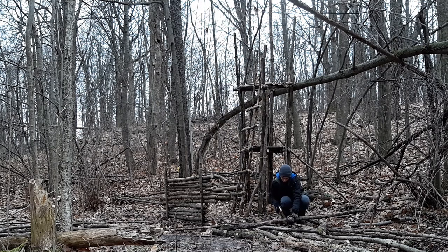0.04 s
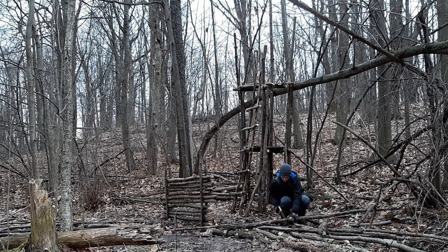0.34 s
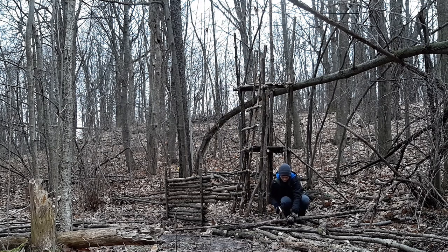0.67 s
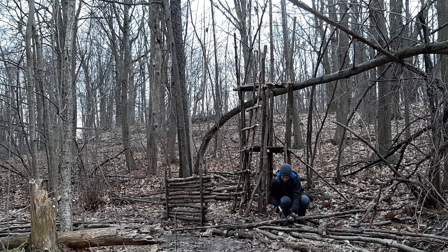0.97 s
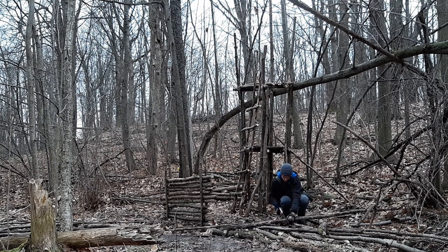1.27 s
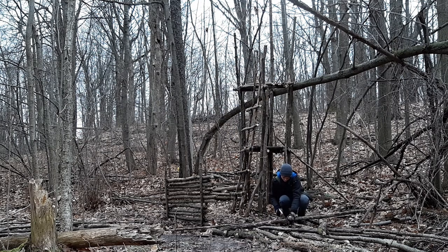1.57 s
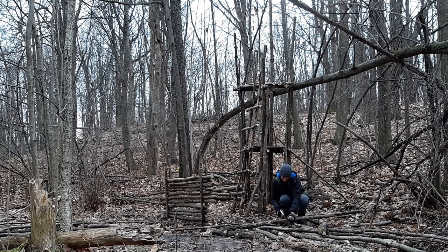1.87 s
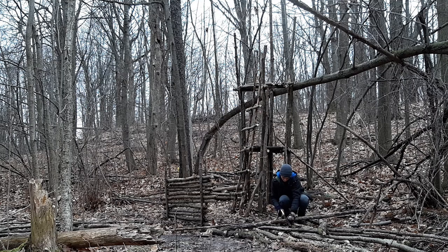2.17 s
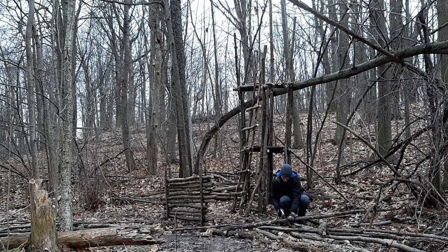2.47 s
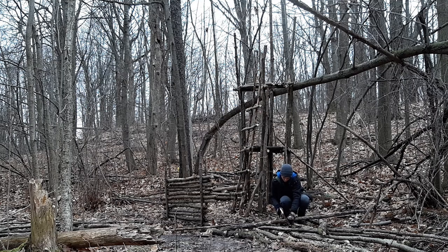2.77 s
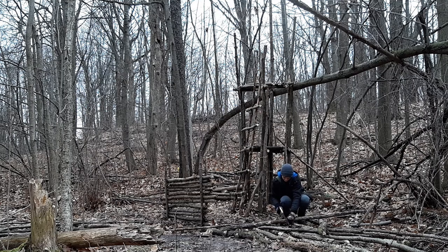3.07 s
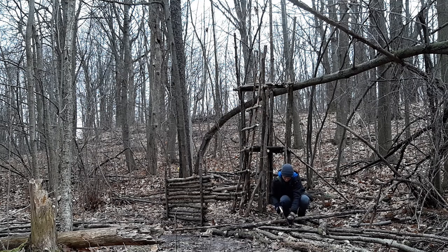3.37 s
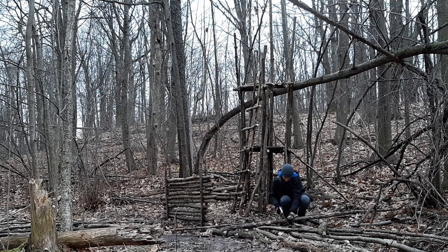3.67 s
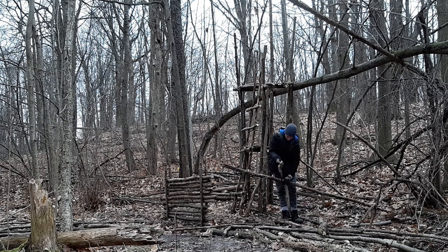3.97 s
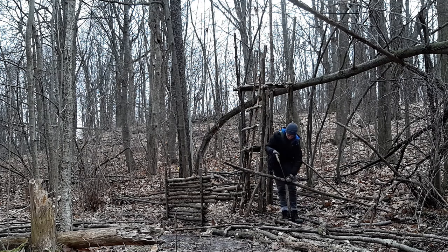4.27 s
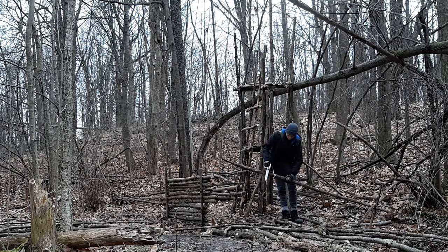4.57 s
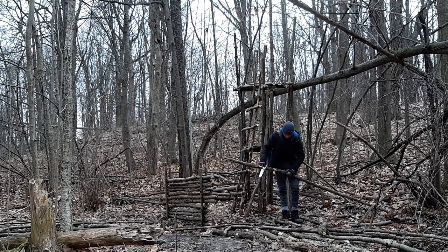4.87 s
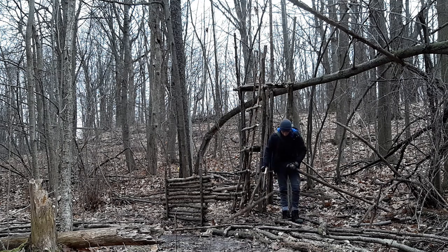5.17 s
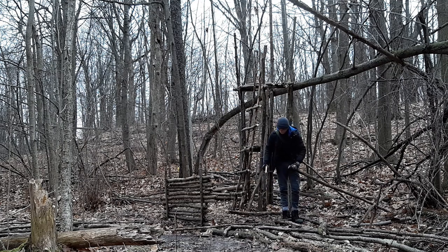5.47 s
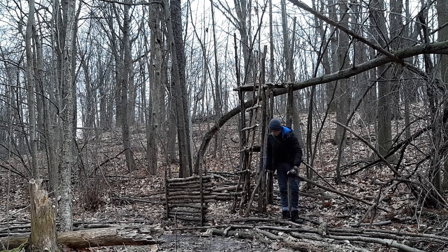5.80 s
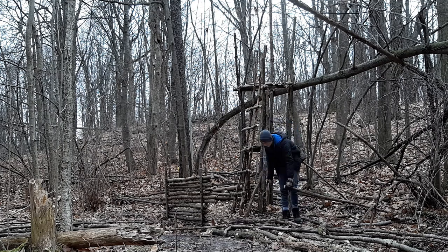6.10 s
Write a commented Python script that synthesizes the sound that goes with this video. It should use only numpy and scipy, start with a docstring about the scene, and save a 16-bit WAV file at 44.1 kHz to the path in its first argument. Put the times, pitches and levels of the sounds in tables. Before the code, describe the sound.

A hand saw cuts a dry branch in quick strokes in quiet woods, then the wood cracks, breaks and knocks on the ground.

```python
"""Sawing a branch in winter woods.

Some metres away a hand saw cuts a dry branch in quick strokes: teeth ring the wood and tear fibres.
The sawing stops, the blade clinks, feet shift in dead leaves; the branch cracks, breaks through and a
piece knocks on the ground. Bare trunks scatter the sound; far rumble and fine hiss lie underneath."""
import sys
import numpy as np
from scipy import signal
from scipy.fft import rfft, irfft, next_fast_len
from scipy.io import wavfile
from scipy.ndimage import map_coordinates

SR = 44100
rng = np.random.default_rng(int(sys.argv[2]) if len(sys.argv) > 2 else 0)


def inscribe(sig):
    """Save sig as 16-bit PCM at rate SR to the path in sys.argv[1].

    A 1-D sig is mono; a 2-D sig holds one channel per row.
    Samples are clipped to [-1, 1] before scaling.
    """
    pcm = np.round(np.clip(np.atleast_2d(sig).T, -1, 1) * 32767)
    wavfile.write(sys.argv[1], SR, pcm.astype(np.int16))


N = 279594
TIME_S = np.arange(N) / SR

# Background spectrum: freq_hz, density_db
AIR_SPECTRUM = [(25, -30), (45, -10), (80, 0), (140, 1), (230, -5.5), (330, -12), (480, -13.5), (750, -22),
                (1500, -25.5), (4200, -24), (6000, -29), (7600, -31.5), (11500, -22.5), (16000, -23.5)]
# Background left-right likeness: freq_hz, correlation
AIR_CORRELATION = [(60, 1), (130, 0.92), (290, 0.87), (640, 0.063), (1410, -0.29), (3100, -0.2),
                   (6820, 0.093), (15000, -0.2)]
# Reflection off near and far trunks: freq_hz, gain_db
NEAR_TRUNK_GAIN = [(100, -22), (400, -17), (1000, -10), (2500, -5), (6000, -6), (16000, -7)]
FAR_TRUNK_GAIN = [(100, -16), (400, -19.5), (1000, -18.5), (2200, -4), (5000, -9), (8000, -6), (16000, -19)]
# One push, then the cutting pull: pull_start_s, push_effort_db, pull_effort_db
SAW_CYCLES = [(0.165, 0, 0), (0.44, -0.5, 0), (0.745, -3, -2), (1.04, 1, 0), (1.315, 1, -1),
              (1.585, 0.5, -2), (1.855, -0.5, 0), (2.118, 2, -1), (2.378, 1.5, 0), (2.67, 2, 0),
              (2.945, 2, -1.5), (3.24, 0, -2), (3.54, -0.5, -1), (3.84, 1.5, 1)]
# Resonances of the wood under the teeth and of the thin blade: freq_hz, width_hz, gain_db
KERF_MODES = [(289, 84, 5), (500, 104, 2), (668, 75, 0), (890, 79, -1.5), (1157, 30, -2.5), (1455, 107, -9),
              (1760, 210, -10), (2266, 290, -10)]
BLADE_MODES = [(4840, 1960, -0.5), (6265, 520, 2.5), (11900, 3100, 1)]
# Fibres tearing in the cut: freq_hz, density_db
RASP_SPECTRUM = [(250, -14), (500, 1), (1000, 4), (1600, 2.5), (2300, 0), (3300, 5), (4600, 3), (5600, 3.5),
                 (6500, 4.5), (7400, -13), (9500, -1.5), (12500, 7), (14500, -23), (16000, -51)]
# Touches on the lifted saw: start_s, level_db
CLINKS = [(4.148, -44), (6.159, -47)]
# Modes of the free blade: freq_hz, gain_db, t60_s
CLINK_MODES = [(4520, -5, .03), (5195, -2, 0.081), (5960, -4, .03), (6858, -6, 0.05)]
# Boots shifting in leaves: peak_s, crackle_db, tread_db
STEPS = [(4.21, -44, -57), (4.285, -54, -60), (4.47, -56, -50.5), (4.73, -51, -48), (5.03, -56, -71),
         (5.48, -64, -45.5), (5.76, -72, -45.5), (6.165, -59, -62), (6.31, -45.5, -63)]
# Leaf crackle and boot tread: freq_hz, density_db
LEAF_SPECTRUM = [(500, -32), (1500, -15), (3500, 1), (5200, 4.5), (6600, 5), (7800, -8), (12000, -2.5),
                 (16000, -23)]
TREAD_SPECTRUM = [(40, -53), (80, 3), (200, 8.5), (450, 5), (700, -2.5), (1500, -29), (5000, -45)]
# Fibres snapping: start_s, level_db, decay_s, splinters_rel_db
CRACKS = [(4.272, -45, 0.0024, -17), (4.545, -43, .001, -25), (4.745, -47, .004, -15),
          (4.878, -24.5, 0.0024, -4.5), (4.8862, -23.5, 0.0027, -14), (4.908, -31.5, 0.0058, -11),
          (5.249, -8, 0.0012, -16), (5.303, -24.5, 0.0015, -28), (5.3248, -8, 0.0013, -30),
          (5.622, -23.5, 0.0016, -16), (5.724, -40, 0.0019, -27)]
# A snap and its tail among the trees: freq_hz, density_db
SNAP_SPECTRUM = [(60, -35), (200, -6), (600, -13), (1100, -1), (2000, 0), (3200, 1.5), (5200, 6),
                 (6800, -0.5), (7700, -6), (10000, 0), (13000, 0.5), (16000, -0.5)]
SNAP_TAIL_SPECTRUM = [(100, -10.5), (450, 5.5), (1000, 1.5), (2200, 4.5), (3500, 2), (5500, 1.5),
                      (7500, -9), (11000, -7.5), (16000, -28)]
# Blows to the branch: start_s, level_db, pitch_hz, decay_s, flex_rel_db
KNOCKS = [(4.703, -47.5, 1280, 0.0032, -20), (5.2486, -22.5, 540, 0.0049, 2.5),
          (5.306, -12, 400, 0.0041, -25), (5.3160, -16, 396, 0.002, -34), (5.324, -6.5, 910, 0.0024, -26),
          (5.3268, -12.5, 473, 0.0037, -8.5), (5.6217, -25, 1150, 0.002, -20),
          (5.6244, -20, 570, 0.0027, -10), (5.637, -7, 470, 0.0025, -16), (5.66, -31.5, 423, .012, -18),
          (5.677, -33, 596, 0.0064, -18), (5.762, -44.5, 543, 0.014, -15)]
# Modes of the whole branch: freq_hz, gain_db, t60_s
BRANCH_MODES = [(260, -24.5, 0.047), (387, -32, 0.041), (476, -33.5, 0.14), (747, -24.5, 0.076),
                (950, -48, .035), (1090, -46, 0.022), (1331, -22.5, 0.065), (1620, -23, 0.064),
                (1950, -25, 0.05)]


def from_db(db):
    """Decibels to gain."""
    return 10 ** (np.asarray(db) / 20)


def unit_rms(x):
    """Scale to unit power."""
    return x / np.sqrt(np.mean(x ** 2) + 1e-20)


def at_hz(points, hz):
    """Interpolate on a log-frequency axis."""
    known_hz, values = np.transpose(points)
    return np.interp(np.log(hz + 1), np.log(known_hz + 1), values)


def colour(x, spectrum, keep_power=True):
    """Minimum-phase filter with the given spectrum."""
    size = next_fast_len(N + 8192, real=True)
    gain = from_db(at_hz(spectrum, np.fft.rfftfreq(size, 1 / SR)))
    cepstrum = irfft(np.log(unit_rms(gain) if keep_power else gain), size)
    cepstrum[1:size // 2] *= 2
    cepstrum[size // 2 + 1:] = 0
    return irfft(rfft(x, size) * np.exp(rfft(cepstrum)), size)[..., :N]


def drift(rate_hz):
    """Smooth random curve, unit RMS."""
    knots = rng.standard_normal(8192)
    return unit_rms(map_coordinates(knots, [TIME_S * rate_hz], order=2, mode="wrap"))


def resonance(x, hz, width_hz):
    """Two-pole band-pass, unit peak gain."""
    r, w = np.exp(-np.pi * width_hz / SR), 2 * np.pi * hz / SR
    return signal.lfilter(np.array([1, 0, -1]) * (1 - r * r) / 2, [1, -2 * r * np.cos(w), r * r], x + 1e-18)


def ring(x, hz, t60_s):
    """One mode: a unit click starts a decaying unit sine."""
    r, w = from_db(-60 / (t60_s * SR)), 2 * np.pi * hz / SR
    return signal.lfilter([0, np.sin(w)], [1, -2 * r * np.cos(w), r * r], x + 1e-18)


def grains(per_s, spread_db):
    """Tiny fractures of uneven size at random times, unit RMS."""
    sizes = from_db(spread_db * np.minimum(rng.exponential(1, N), 4)) * rng.choice([-1, 1], N)
    return unit_rms(sizes * (rng.random(N) < per_s / SR))


def swell(peak_s, rise_s, fall_s):
    """Envelope: exponential rise and fall."""
    age_s = TIME_S - peak_s
    return np.exp(-np.minimum(np.maximum(-age_s / rise_s, age_s / fall_s), 40))


def strike(start_s, decay_s):
    """Envelope: instant onset, exponential fall."""
    return (TIME_S >= start_s) * np.exp(-np.clip((TIME_S - start_s) / decay_s, 0, 40))


def damped_sine(start_s, hz, decay_s):
    """A swing that dies within a few cycles."""
    return np.sin(2 * np.pi * hz * (TIME_S - start_s)) * strike(start_s, decay_s)


def from_right(x, lag_samples=4):
    """Direct sound reaches the left side later."""
    return np.array([np.pad(x, (lag_samples, 0))[:N], x])


def echoes(x, spectrum, t60_s, onset_s):
    """Many trunks each return a faint copy, different on each side."""
    age_s = TIME_S[:SR]
    build_up = 1 - np.exp(-(age_s / onset_s) ** 2)
    response = rng.standard_normal((2, SR)) * from_db(-60 * age_s / t60_s) * build_up
    response /= np.sqrt(np.sum(response ** 2, axis=1, keepdims=True))
    return colour(signal.fftconvolve(x[None], response, axes=1)[:, :N], spectrum, keep_power=False)


def among_trunks(x):
    """Direct sound plus near and far scatter."""
    near = echoes(x, NEAR_TRUNK_GAIN, t60_s=0.11, onset_s=0.002)
    far = echoes(x, FAR_TRUNK_GAIN, t60_s=0.72, onset_s=0.017)
    return from_right(x) + near + far


def air(base_db=-48, flutter_db=2, left_hiss_db=3, right_hiss_db=1.5):
    """Far wavering rumble, alike on both sides; fine diffuse hiss, stronger on the left."""
    mid, side = rfft(rng.standard_normal((2, N)))
    correlation = np.clip(at_hz(AIR_CORRELATION, np.fft.rfftfreq(N, 1 / SR)), -0.99, 0.99)
    noise = irfft(np.sqrt(1 + correlation) * mid + np.sqrt(1 - correlation) * side * [[1], [-1]], N)
    noise = from_db(base_db) * colour(noise, AIR_SPECTRUM)
    rumble = signal.sosfilt(signal.butter(1, 600, fs=SR, output="sos"), noise)
    hiss = (noise - rumble) * from_db([[left_hiss_db], [right_hiss_db]])
    return rumble * from_db(flutter_db * drift(rate_hz=9)) + hiss


def arm(first_push_s=0.02, last_turn_s=3.98, push_reach=81, pull_reach=98):
    """Push and pull share each cycle evenly. Travel is constant, so shorter strokes run faster."""
    pull_s, push_db, pull_db = np.transpose(SAW_CYCLES)
    push_s = np.append(first_push_s, (pull_s[:-1] + pull_s[1:]) / 2)
    turns_s = np.append(np.column_stack([push_s, pull_s]), last_turn_s)
    progress = np.interp(TIME_S, turns_s, np.arange(len(turns_s)))
    stroke = np.minimum(progress.astype(int), len(turns_s) - 2)
    swing = np.abs(np.sin(np.pi * progress))
    pulling = stroke % 2
    peak_tooth_hz = np.where(pulling, pull_reach, push_reach) / np.diff(turns_s)[stroke]
    effort_db = np.column_stack([push_db, pull_db]).ravel()[stroke]
    return swing, pulling, peak_tooth_hz, effort_db


def tooth_strikes(teeth, pulling, snag_gain, set_depth=0.61, chip_db=-9, chip_db_per_s=2.5):
    """Teeth strike and ring the wood, chipping more raggedly as the cut deepens; unit RMS."""
    tooth = np.floor(teeth)
    # Teeth are set left and right: every second one bites harder, most on the pull.
    alternation = 1 + set_depth * np.where(pulling, 1, 0.8) * np.cos(np.pi * tooth)
    bites = np.diff(tooth, prepend=0) * alternation * (1 + 0.47 * rng.standard_normal(N))
    chip_gain = from_db(chip_db + chip_db_per_s * TIME_S)
    chips = chip_gain * grains(per_s=3000, spread_db=4.5)
    force = (unit_rms(bites) + chips) / np.hypot(1, chip_gain) * snag_gain
    upper_gain = np.where(pulling, 1, 0.67)  # the sliding push is duller
    wood = sum((-1) ** k * from_db(db) * resonance(force, hz, width_hz) * (upper_gain if hz > 1300 else 1)
               for k, (hz, width_hz, db) in enumerate(KERF_MODES))
    return unit_rms(wood)


def tearing_fibres(teeth, snag_gain, pulse_depth=0.37, mix_db=-2):
    """Each tooth tears a puff of fibres; scatter off the moving blade is uncorrelated left to right."""
    pulses = 1 + pulse_depth * np.cos(2 * np.pi * teeth)
    puffs = unit_rms(grains(per_s=7000, spread_db=4.5) * pulses * snag_gain)
    scatter = rng.standard_normal((2, N))
    return from_db(mix_db) * (from_right(puffs) + scatter)


def saw(snag_db=1.7, press_db=1.8, wood_db_per_s=0.47, push_rasp_db_per_s=-1.2, stop_s=3.926, fade_s=0.015):
    """The blade speeds up and stops each stroke: wood rings, fibres rasp, the thin blade sings along."""
    swing, pulling, peak_tooth_hz, effort_db = arm()
    # Snags and hand pressure slow the blade and deepen its bite.
    snag, press = drift(rate_hz=130), drift(rate_hz=22)
    snag_gain = from_db(snag_db * snag)
    tooth_hz = peak_tooth_hz * swing ** 0.7 * (1 - 0.014 * snag - 0.04 * press)
    teeth = np.cumsum(tooth_hz) / SR

    wood_db = effort_db + np.where(pulling, -47.5, -50.5) + wood_db_per_s * TIME_S + press_db * press
    wood = tooth_strikes(teeth, pulling, snag_gain) * from_db(wood_db) * swing ** 0.74

    tearing_db = effort_db + np.where(pulling, -47.5, -48 + push_rasp_db_per_s * TIME_S)
    tearing = tearing_fibres(teeth, snag_gain) * from_db(tearing_db)
    rasp = colour(tearing, RASP_SPECTRUM) * swing ** 0.67
    blade = sum(from_db(db) * resonance(tearing, hz, width_hz) for hz, width_hz, db in BLADE_MODES)
    blade *= swing ** 3.3 * from_db(np.where(pulling, 9, 6))

    sawing = among_trunks(wood) + rasp + blade + echoes(rasp[1], FAR_TRUNK_GAIN, t60_s=0.31, onset_s=0.03)
    return sawing * np.clip((stop_s - TIME_S) / fade_s + 1, 0, 1)  # last pull cut short


def clinks():
    """Light touches ring the free saw blade."""
    touches = np.zeros(N)
    for start_s, db in CLINKS:
        touches[round(start_s * SR)] = from_db(db)
    ringing = sum(from_db(db) * ring(touches, hz, t60_s) for hz, db, t60_s in CLINK_MODES)
    return from_right(ringing, lag_samples=2)


def feet(clump_db=3):
    """Dead leaves crackle in clumps over the dull tread of a boot."""
    crush = sum(from_db(db) * swell(peak_s, rise_s=0.024, fall_s=0.029) for peak_s, db, _ in STEPS)
    weight = sum(from_db(db) * swell(peak_s, rise_s=0.048, fall_s=0.045) for peak_s, _, db in STEPS)
    crackle = grains(per_s=900, spread_db=4.5) * crush * from_db(clump_db * drift(rate_hz=60))
    tread = grains(per_s=600, spread_db=0) * weight
    return colour(crackle, LEAF_SPECTRUM) + colour(tread, TREAD_SPECTRUM)


def cracks(give_s=0.0023, give_db=-14, pan_left_db=1.5, near_db=1, tail_db=-11, tail_t60_s=0.72):
    """Fibres give, snap and splinter within milliseconds; countless echoes leave a diffuse tail."""
    burst = np.zeros(N)
    for start_s, db, decay_s, splinters_db in CRACKS:
        give = from_db(give_db) * strike(start_s - give_s, give_s)
        splinters = from_db(splinters_db) * strike(start_s + 0.0099, decay_s=0.0051)
        burst += from_db(db) * (give + strike(start_s, decay_s) + splinters)
    snaps = colour(burst * grains(per_s=18000, spread_db=0.5), SNAP_SPECTRUM)
    direct = from_right(snaps, lag_samples=2) * from_db([[pan_left_db], [-pan_left_db]])
    near = echoes(snaps, NEAR_TRUNK_GAIN, t60_s=0.11, onset_s=0.002)
    energy_kept = from_db(-120 / (tail_t60_s * SR))  # per sample
    tail_energy = signal.lfilter([1 - energy_kept], [1, -energy_kept], burst ** 2 + 1e-18)
    tail = np.sqrt(tail_energy) * colour(rng.standard_normal((2, N)), SNAP_TAIL_SPECTRUM)
    return direct + from_db(near_db) * near + from_db(tail_db) * tail


def knocks(flex_delay_s=0.0028, low_cut_hz=170):
    """Each blow is a damped swing, slow on earth, fast on wood; the branch flexes back and rings."""
    contact = np.zeros(N)
    for start_s, db, pitch_hz, decay_s, flex_db in KNOCKS:
        flex = from_db(flex_db) * damped_sine(start_s + flex_delay_s, hz=257, decay_s=0.0067)
        contact += from_db(db) * (damped_sine(start_s, pitch_hz, decay_s) + flex)
    ringing = sum(from_db(db) * 2 * np.pi * hz / SR * ring(contact, hz, t60_s)
                  for hz, db, t60_s in BRANCH_MODES)
    # A thin branch radiates little bass.
    return signal.sosfilt(signal.butter(2, low_cut_hz, "high", fs=SR, output="sos"), contact + ringing)


def scene():
    """Sawing, then the break, over the background air."""
    return air() + saw() + clinks() + cracks() + among_trunks(feet() + knocks())


def record(dry, ceiling=0.7, cutoff_hz=15900):
    """Soft clip, then a steep low-pass."""
    rounded = ceiling * np.tanh(dry / ceiling)
    return signal.sosfilt(signal.ellip(10, 0.1, 70, cutoff_hz, fs=SR, output="sos"), rounded)


dry = scene()
out = record(dry)
inscribe(out)
```